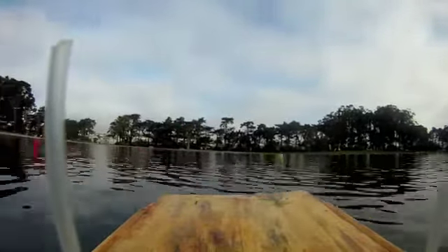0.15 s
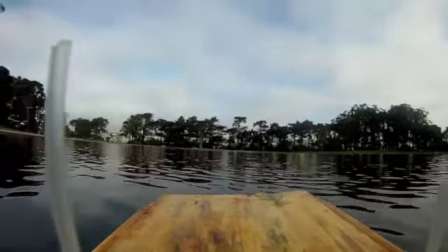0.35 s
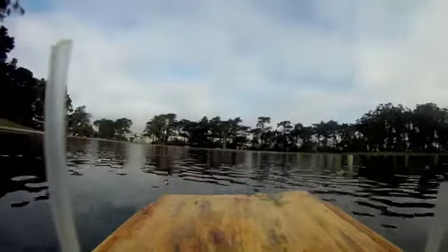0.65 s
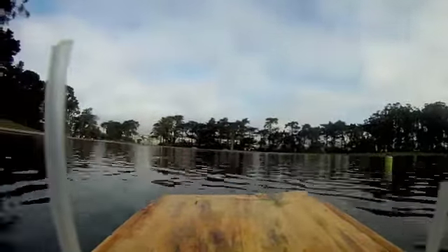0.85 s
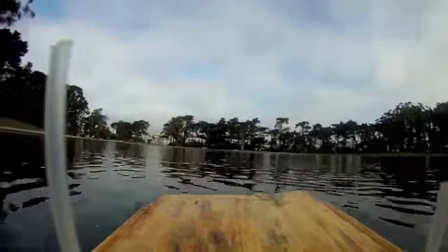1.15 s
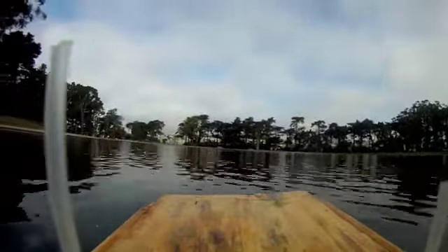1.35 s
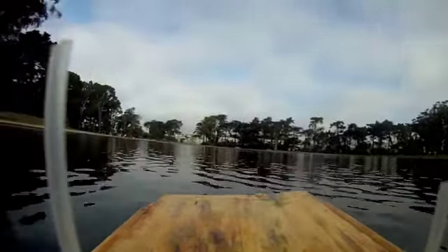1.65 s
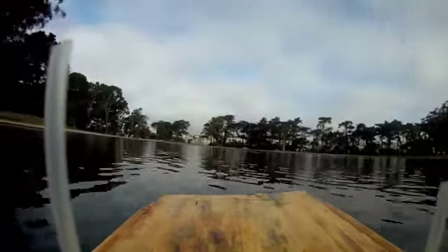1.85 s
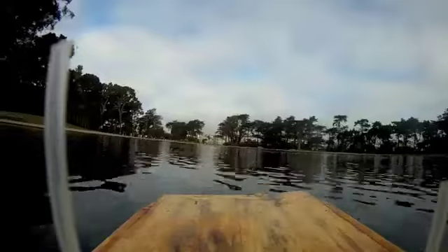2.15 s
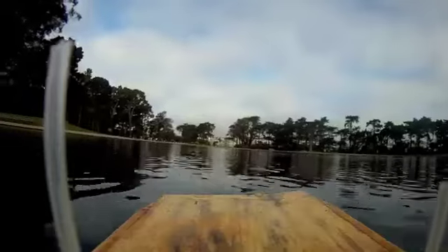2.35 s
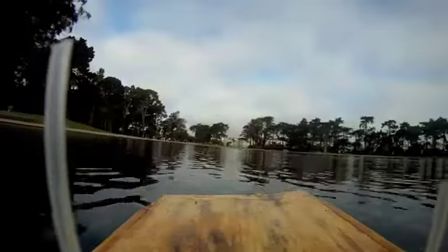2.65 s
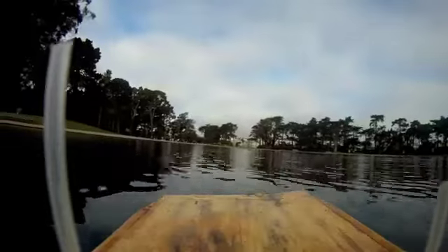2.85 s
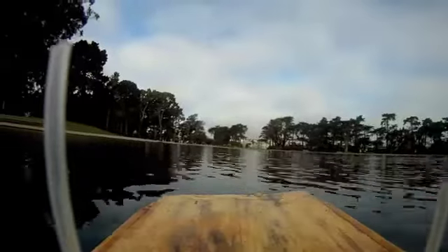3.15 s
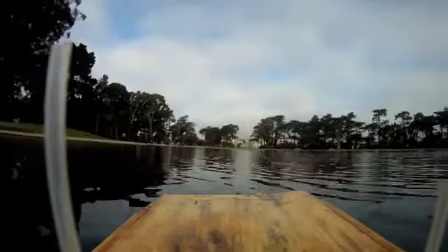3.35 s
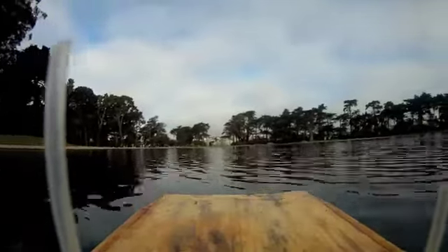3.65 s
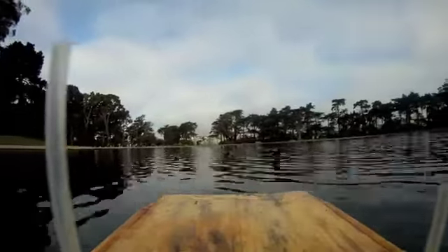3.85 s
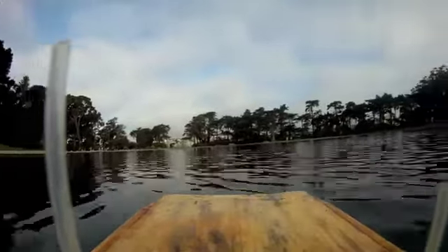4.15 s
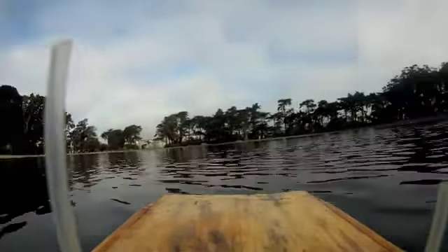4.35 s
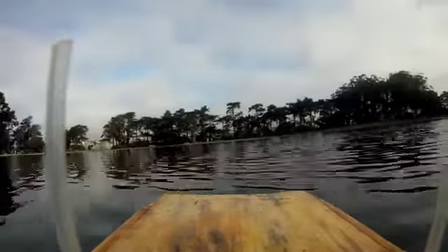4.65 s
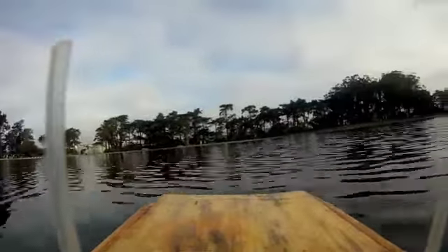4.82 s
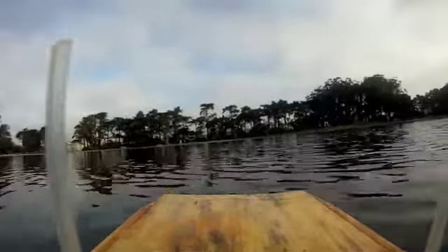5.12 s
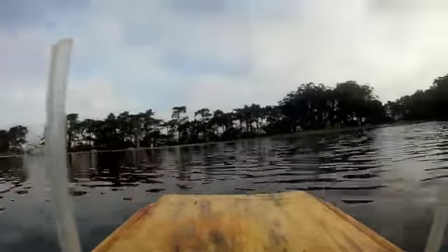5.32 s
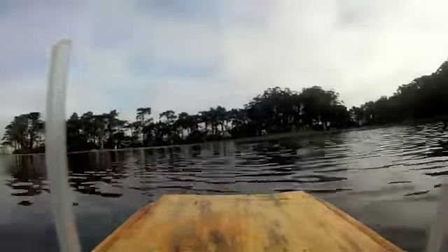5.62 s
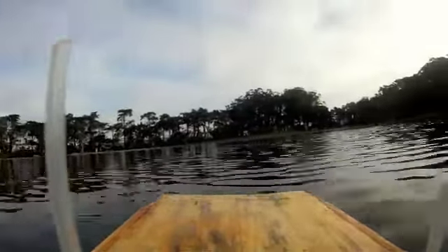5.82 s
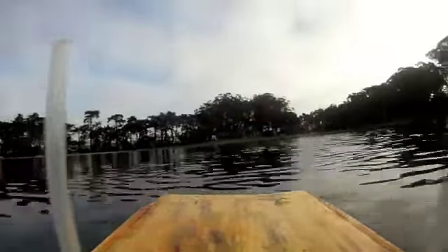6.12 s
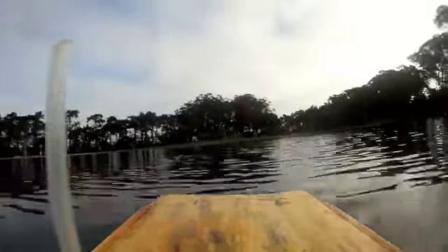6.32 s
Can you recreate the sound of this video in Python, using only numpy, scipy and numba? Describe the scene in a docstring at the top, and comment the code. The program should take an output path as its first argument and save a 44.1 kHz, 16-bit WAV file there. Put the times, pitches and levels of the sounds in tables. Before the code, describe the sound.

A model boat's propeller motor hums, whines and rattles up close, stepping up in pitch twice over a faint water rumble.

```python
"""A model air boat on a lake

A small camera rides on the wooden hull. The propeller hums and speeds up in two small steps.
The motor's ball bearings whine, and their loose balls rattle the motor mount and the hull.
Water rumbles under the boat and waves rock it. The camera limits the level, and its 12 kHz
converter holds each sample, which mirrors the rattle into a thin, high sizzle."""
import sys
import numpy as np
from scipy import signal
from scipy.io import wavfile
from scipy.ndimage import uniform_filter1d, minimum_filter1d
from numba import njit

SR = 44100
rng = np.random.default_rng(int(sys.argv[2]) if len(sys.argv) > 2 else 0)


def to_wav(s):
    """Save 16-bit WAV."""
    ch = np.atleast_2d(s).T  # columns
    pcm = np.round(np.clip(ch, -1, 1) * 32767)  # PCM
    wavfile.write(sys.argv[1], SR, pcm.astype(np.int16))


N = 285768
TIME = np.arange(N) / SR
SPEEDS_HZ = (208, 231, 256)  # slow, middle and fast, in shaft turns per second


def undb(db):
    """Turn decibels into a number to multiply by."""
    return 10 ** (np.asarray(db) / 20)


def unit(x):
    """Scale a signal so that its average strength (rms) is 1."""
    return x / np.sqrt(np.mean(x ** 2))


def wander(rate):
    """A random curve of strength 1 that changes course about rate times a second."""
    steps = rng.standard_normal(1024)
    return unit(np.interp(TIME * rate, np.arange(len(steps)), steps))


def ring(x, hz, width):
    """Make x ring near one pitch; filtering twice cuts the other pitches more steeply."""
    b, a = signal.iirpeak(hz, hz / width, fs=SR)
    return signal.lfilter(b, a, signal.lfilter(b, a, x))


def tone(angle, db, flutter_db, wobble):
    """One pure tone that flutters a little in level and timing."""
    phase = angle + wobble * wander(25) + 2 * np.pi * rng.random()
    return np.sqrt(2) * undb(db + flutter_db * wander(16)) * np.sin(phase)


def swells(rows, rise_s, fall_s):
    """A loudness curve in which each event rises, holds and falls."""
    return sum(undb(db) * np.interp(TIME, (s - rise_s, s, s + length, s + length + fall_s), (0, 1, 1, 0))
               for s, length, db in rows)


# The throttle opens twice. Each row: start in seconds, added speed in Hz, spin-up time in seconds.
THROTTLE_STEPS = [(.85, 23.5, .21), (1.3, 26.8, .135)]


def shaft_speed():
    """Turns per second: the motor settles after each step, then sags as the boat comes round."""
    gained = sum(hz * np.tanh(np.maximum(TIME - s, 0) / spin_up_s) for s, hz, spin_up_s in THROTTLE_STEPS)
    sag = np.interp(TIME, (2.4, 4.5), (0, 2.5))
    return 208.4 + gained - sag


# Propeller and motor tones. Each row: multiple of the shaft speed, relative dB when slow and when fast.
PROPELLER_TONES = [(1, -52, -55), (2, -54.5, -58.5), (4, -43, -38), (5, -43.5, -62), (6, -49, -42.5),
                   (8, -52, -30), (10, -34, -42.5), (12, -44, -52.5), (14, -56, -62), (16, -54, -64.5),
                   (18, -61.5, -69), (20, -63, -69.5), (22, -74, -69.5)]


def propeller(shaft_angle, throttle, load_db):
    """Clean tones follow the shaft; the higher ones are less steady and grow with the load."""
    hum = 0
    for k, slow_db, fast_db in PROPELLER_TONES:
        db = slow_db + throttle * (fast_db - slow_db) + load_db * np.interp(k, (2, 6), (0, .35))
        hum += tone(round(k) * shaft_angle, db, flutter_db=1.83, wobble=.056 * k)
    return hum


# Bearing tones. Each row: multiple of the shaft speed, multiple of the rate at which balls pass
# (both get rounded), then relative dB at slow, middle and fast speed.
BEARING_TONES = [(0.5, 1, -58, -62, -60.5), (6, -1, -33.5, -40, -29), (0, 2, -33.5, -35, -43),
                 (6.5, -1, -35, -37.5, -47), (8, -1, -27.5, -39, -42.5), (4, 2, -38, -37, -51.5),
                 (0, 3, -31, -33.5, -64.5), (12, -2, -38, -55, -41.5), (12, -1, -27, -36, -53.5),
                 (0, 5, -30, -48, -70), (18, -3, -31, -58, -67.5)]


def bearing_whine(shaft_angle, ball_angle, speed):
    """The balls' wavy tracks sing at sums and differences of the shaft and ball rates."""
    whine = 0
    for k, m, *levels_db in BEARING_TONES:
        angle = round(k) * shaft_angle + round(m) * ball_angle
        whine += tone(angle, np.interp(speed, SPEEDS_HZ, levels_db), flutter_db=1, wobble=.26)
    return whine


def bearing_taps(shaft_angle, ball_angle, speed, per_turn):
    """Loose balls tap in flurries, most often as one passes and the unbalanced propeller presses on it."""
    pressure = (1 + .5 * np.cos(shaft_angle)) * (1 + .6 * np.cos(ball_angle))
    taps = rng.random(N) < per_turn * speed * pressure / SR
    flurries = undb(.93 * wander(110))
    return taps * flurries


def rattle(taps, notes, throttle, load_db):
    """Each tap rings each note with a random strength; harder contact under load lifts the high notes."""
    out = 0
    for hz, width, slow_db, fast_db in notes:
        bright_db = .53 * load_db if hz > 2800 else 0
        db = slow_db + throttle * (fast_db - slow_db) + bright_db
        out += ring(taps * rng.standard_normal(N), hz, width) * undb(db)
    return unit(out)


# The motor mount's ringing notes. Each row: pitch in Hz, width in Hz, relative dB when slow and when fast.
MOUNT_NOTES = [(1883, 170, -10, -15), (2008, 182.5, 0.5, 0), (2400, 85, -8.5, -13), (2491, 70, -11.5, -13),
               (3070, 390, -31.5, -34.5), (3590, 294, -30.5, -33), (4100, 450, -38, -41),
               (4970, 660, -44.5, -48.5)]


def mount_rattle(taps, throttle, load_db):
    """The taps keep the motor mount rattling at an even level."""
    return rattle(taps, MOUNT_NOTES, throttle, load_db) * undb(-15.5)


# The hull's ringing notes. Each row: pitch in Hz, width in Hz, relative dB when slow and when fast.
HULL_NOTES = [(373, 86, -34.5, -32.5), (495, 130, -34, -32), (723.7, 72, -8.5, -5.5),
              (966.4, 150, -12, -2.5), (1154.5, 175, -5, 1), (1270, 223, 0, -6.5), (1430, 174, -8, -6.5)]


def hull_rattle(taps, throttle, load_db):
    """The taps ring the wooden hull too; its share falls with speed and grows with load."""
    return rattle(taps, HULL_NOTES, throttle, load_db) * undb(-19.5 - 4 * throttle + .5 * load_db)


# Hollow notes of the hull on the water. Each row: pitch in Hz, width in Hz, relative level in dB.
WATER_NOTES = [(62, 30, 0.5), (103, 25, 1), (175, 320, -10)]


def water(load_db):
    """Running water, louder under load, and slapping wavelets rumble in the hollow hull."""
    flow = undb(-59 + .5 * load_db + 2 * wander(12))
    rumble = sum(undb(db) * ring(rng.standard_normal(N), hz, width) for hz, width, db in WATER_NOTES)
    return unit(rumble) * np.hypot(flow, slaps())


# Waves that rock the boat. Each row: start in seconds, length in seconds, relative level in dB.
WAVES = [(0.02, 0.27, -40), (0.569, 0.1, -49), (0.77, 0.12, -42), (1.191, 0.2, -45), (1.954, 0.11, -43),
         (2.334, 0.088, -46), (3.885, 0.042, -49), (4.568, 0.33, -44), (5.146, 0.044, -46),
         (5.5, 0.046, -45), (5.689, 0.052, -47), (5.87, 0.59, -40.5)]


def sway(hz=29):
    """Waves, and small ripples between them, rock the camera on the deck at one low pitch."""
    rocking = undb(-2.5) * swells(WAVES, rise_s=.06, fall_s=.08)
    ripples = undb(-54 + 5.5 * wander(9))
    return np.hypot(rocking, ripples) * tone(2 * np.pi * hz * TIME, 0, flutter_db=1.5, wobble=.4)


# Wavelets under the hull. Each row: start in seconds, length in seconds, level in dB.
SLAPS = [(0.517, 0.046, -55), (0.758, 0.066, -54), (1.237, 0.058, -53), (3.825, 0.05, -50),
         (3.969, 0.052, -52), (5.094, 0.084, -56), (5.26, 0.07, -57), (5.472, 0.1, -53),
         (5.827, 0.046, -56), (5.91, 0.04, -59), (6.33, 0.11, -53)]


def slaps():
    """A loudness curve: each wavelet that hits the hull briefly swells the rumble."""
    return swells(SLAPS, rise_s=.015, fall_s=.03)


# Hard knocks in the motor mount. Each row: time in seconds, strength in dB.
KNOCKS = [(0.9313, -3), (1.071, -3), (1.1144, -4), (1.6826, -4), (1.8711, -3), (2.165, -3), (4.4278, -5),
          (4.4533, -5), (4.7247, -4)]


def lift_off(lull_s=.012, dip_db=-9):
    """A loudness curve: a ball lifts off just before each hard knock, so the rattle dips."""
    return undb(dip_db * sum((TIME > s - lull_s) & (TIME < s) for s, _ in KNOCKS))


def hard_knocks():
    """Now and then a single hard blow rings the whole mount."""
    blows = 1e-18 * rng.standard_normal(N)  # far too faint to hear
    for s, db in KNOCKS:
        blows[int(s * SR)] = undb(db)
    # the contact lasts a moment, so the highest notes stay quiet
    push = signal.sosfilt(signal.butter(4, 2600, fs=SR, output="sos"), blows)
    ringing = sum(undb(db) * ring(push, hz, width) for hz, width, _, db in MOUNT_NOTES)
    return ringing * blows.max() / np.abs(ringing).max()


# How hard the motor works: it eases mid-turn, then grows. Each row: time in seconds, load in dB.
MOTOR_LOAD = [(0, -2.5), (.9, -1), (1.45, 1.5), (2.6, -1), (4.4, 1.5), (5.4, 4), (6.48, 4.5)]


def scene():
    """One motor speed drives the tones and the rattle; the load shapes their strength."""
    speed = shaft_speed()
    load_db = np.interp(TIME, *np.transpose(MOTOR_LOAD))
    throttle = np.interp(speed, SPEEDS_HZ, (0, .5, 1))
    # balls passing one spot per shaft turn: their cage slips a little and lags more under thrust
    passes = np.interp(throttle, (0, 1), (2.196, 2.168)) * (1 + .0013 * wander(9))
    shaft_angle = 2 * np.pi * np.cumsum(speed) / SR
    ball_angle = 2 * np.pi * np.cumsum(speed * passes) / SR
    taps = bearing_taps(shaft_angle, ball_angle, speed, per_turn=14) * lift_off()
    mount = mount_rattle(taps, throttle, load_db) + hard_knocks()
    hull = hull_rattle(taps, throttle, load_db)
    whine = bearing_whine(shaft_angle, ball_angle, speed) * undb(load_db + 1.5)
    hum = propeller(shaft_angle, throttle, load_db) * undb(3)
    return (hum + whine + mount + hull + sway() + water(load_db))[None]


@njit
def follow_peaks(x, attack, release):
    """Track the sound's peaks, rising fast and sinking slowly."""
    peaks, level = np.empty(len(x)), .4
    for i in range(len(x)):
        level += (abs(x[i]) - level) * (attack if abs(x[i]) > level else release)
        peaks[i] = level
    return peaks


def limiter(x, top_db, attack_s, release_s):
    """Turn the sound down smoothly, a moment ahead, while its peaks are over the top level."""
    peaks = follow_peaks(x, 1 / (attack_s * SR), 1 / (release_s * SR))
    gain = np.minimum(1, undb(top_db) / peaks)
    return x * uniform_filter1d(minimum_filter1d(gain, size=128), size=128)


def record(dry):
    """The camera limits the level, then holds each sample, which mirrors the sound into the treble."""
    converter_hz, repeats = 12000, 4
    limited = limiter(dry[0], top_db=-5.5, attack_s=.00013, release_s=.015)
    dulled = signal.sosfilt(signal.ellip(8, .1, 70, 5780, fs=SR, output="sos"), limited)
    held = np.repeat(signal.resample_poly(dulled, converter_hz, SR), repeats)
    sizzling = signal.resample_poly(held, SR, converter_hz * repeats)[:N]
    return signal.sosfilt(signal.ellip(12, .1, 80, 15200, fs=SR, output="sos"), sizzling)[None]


dry = scene()
out = record(dry)
to_wav(out)
```